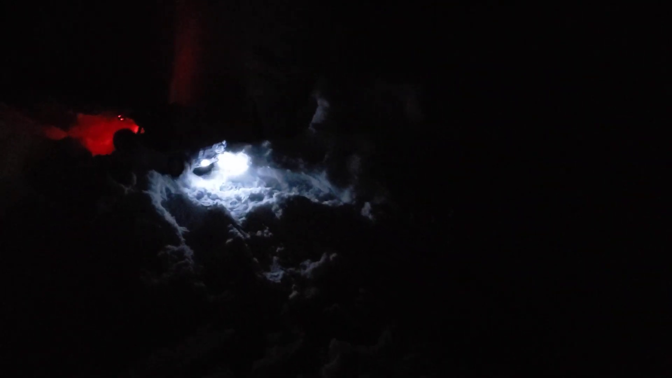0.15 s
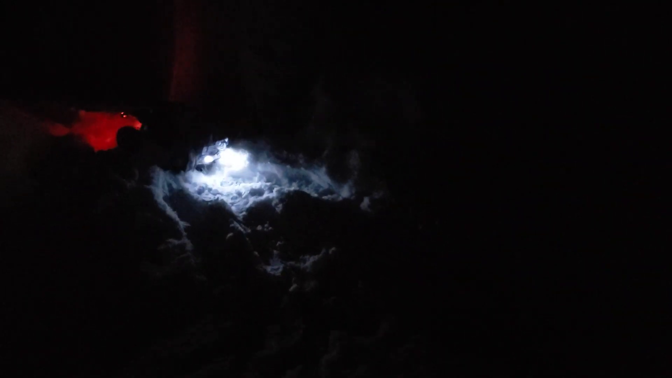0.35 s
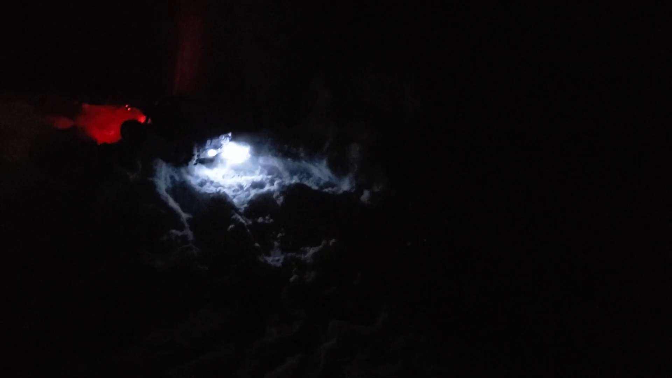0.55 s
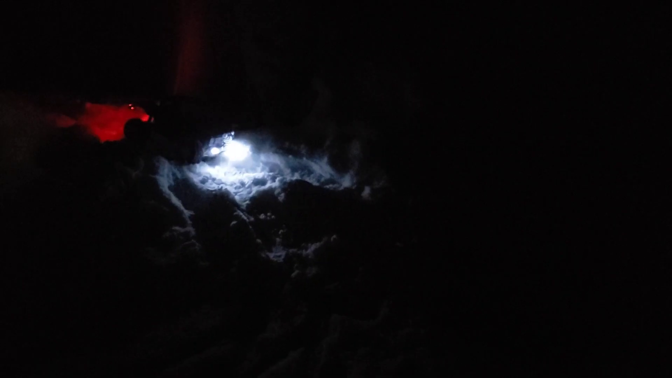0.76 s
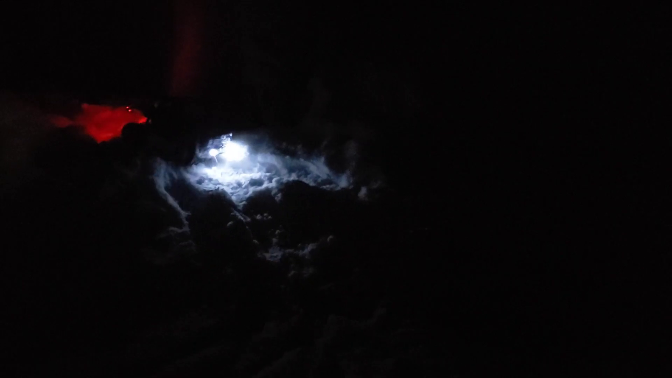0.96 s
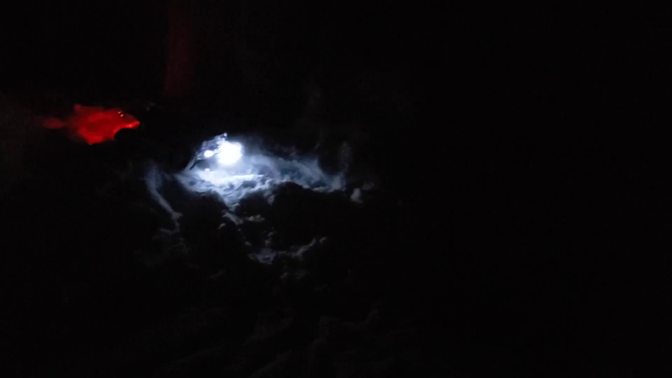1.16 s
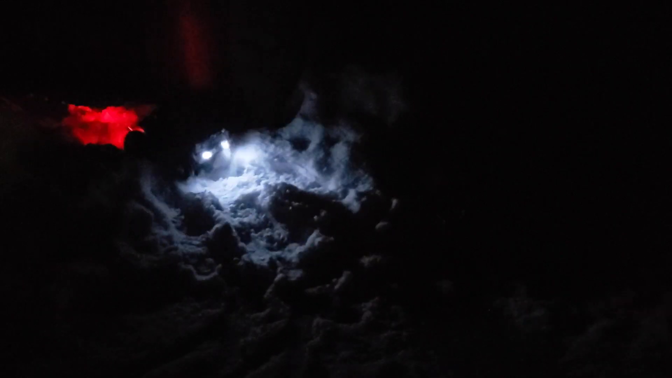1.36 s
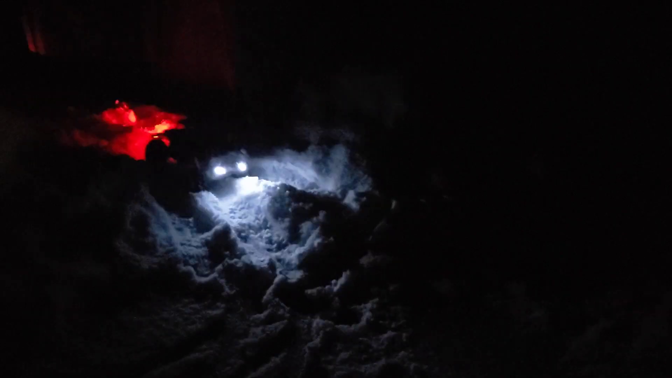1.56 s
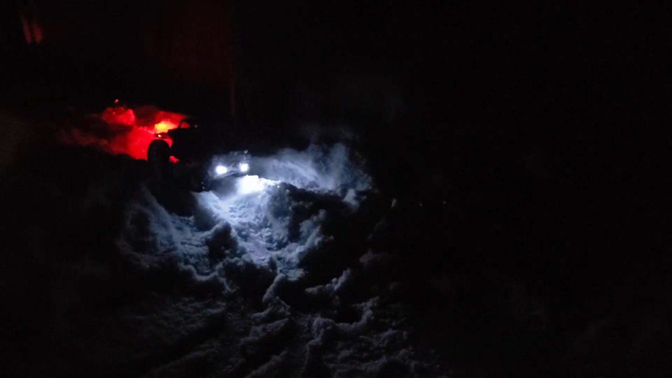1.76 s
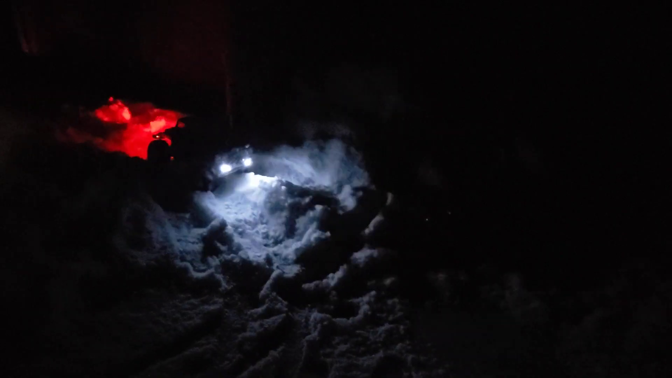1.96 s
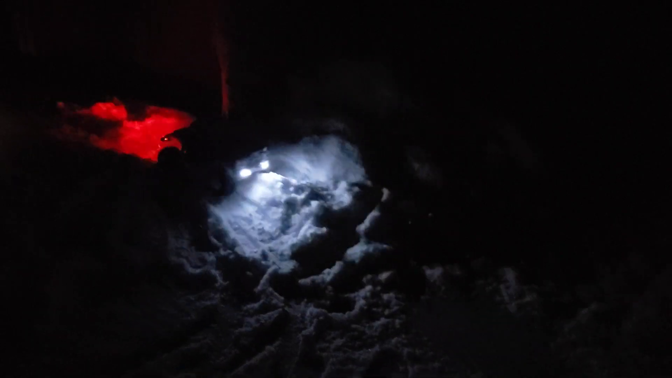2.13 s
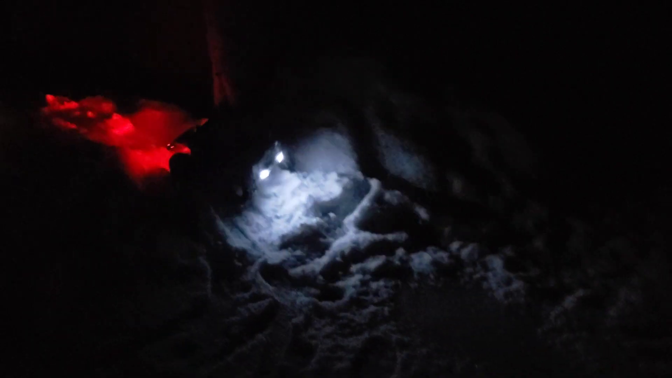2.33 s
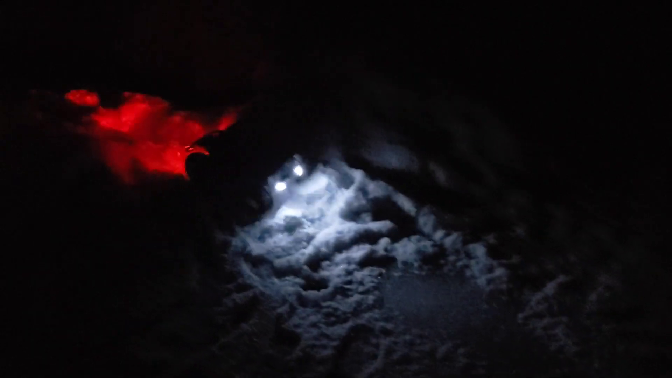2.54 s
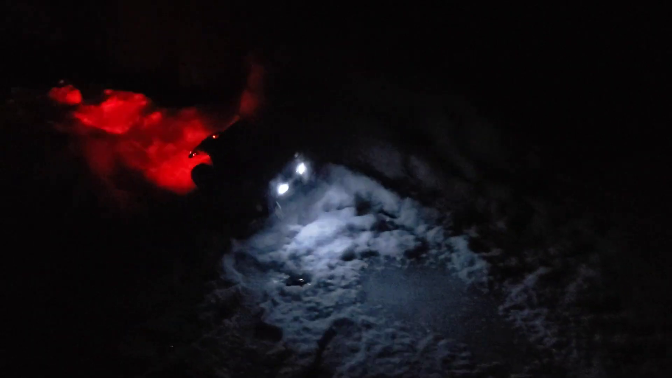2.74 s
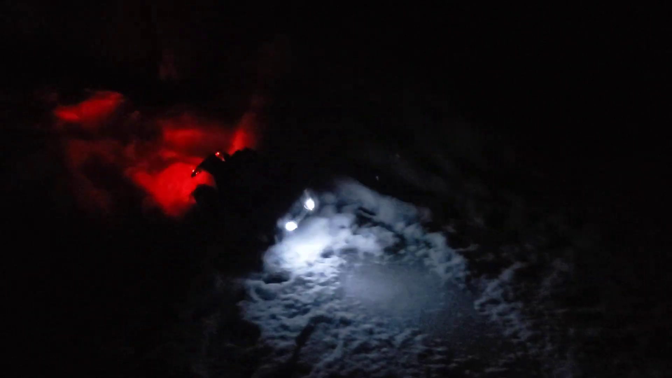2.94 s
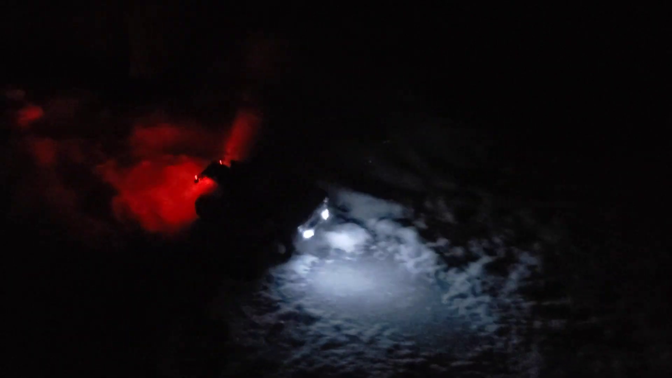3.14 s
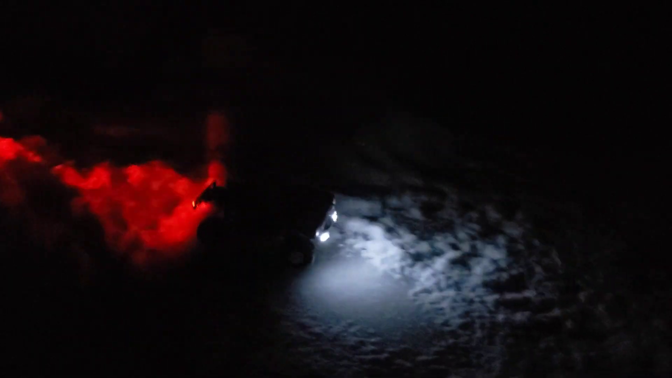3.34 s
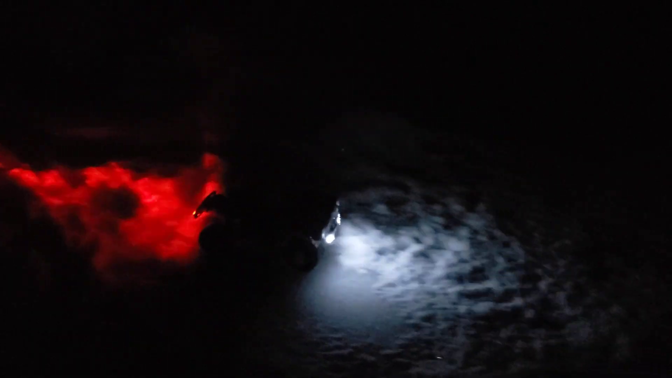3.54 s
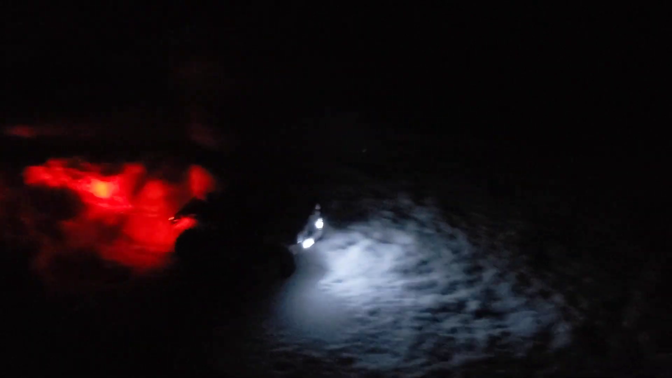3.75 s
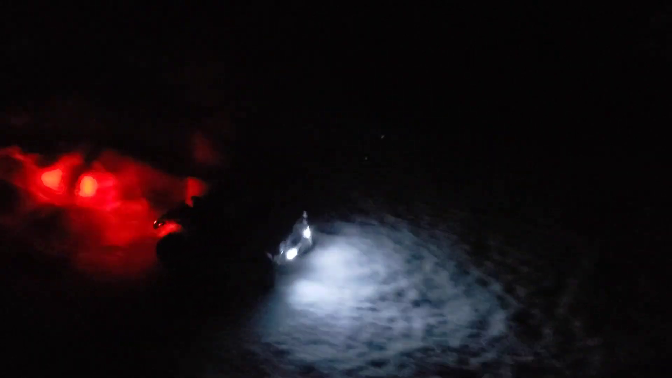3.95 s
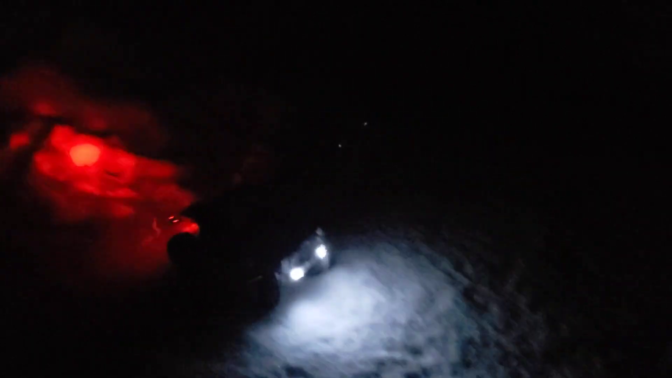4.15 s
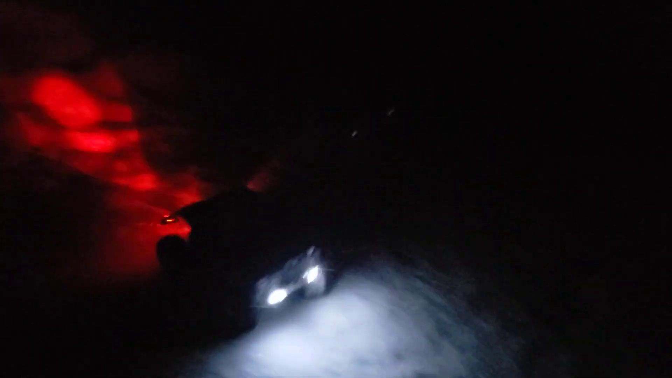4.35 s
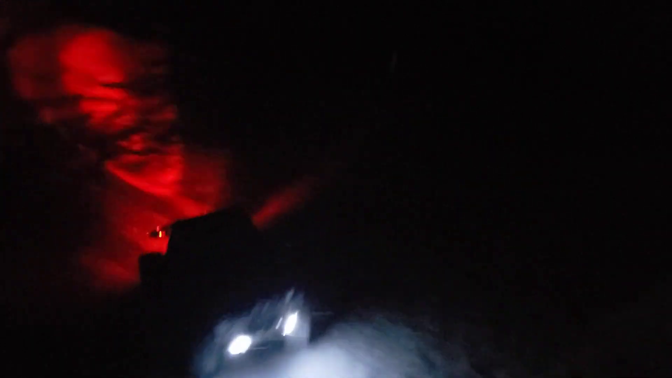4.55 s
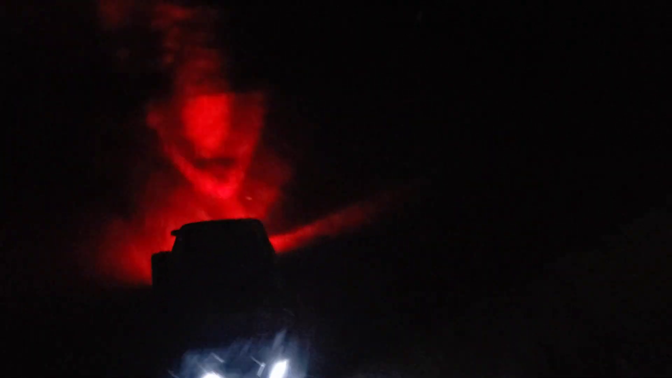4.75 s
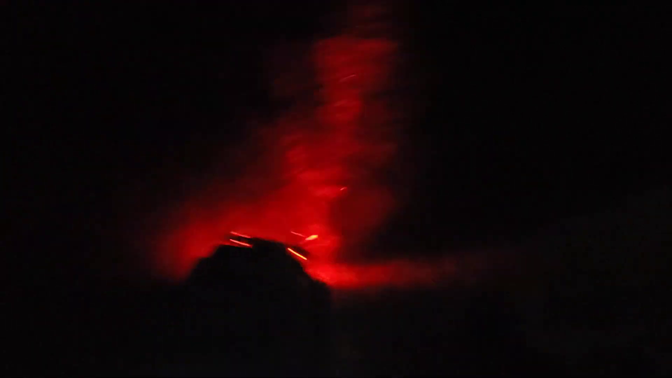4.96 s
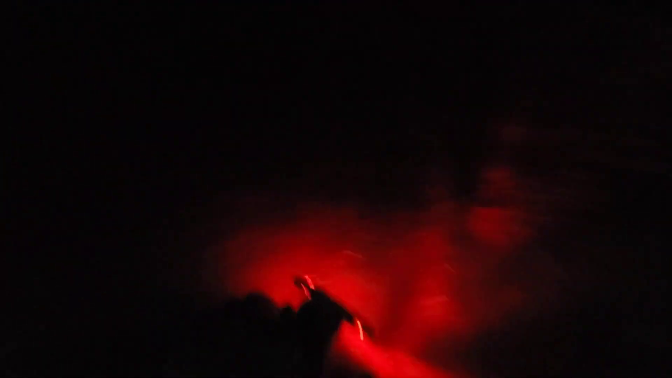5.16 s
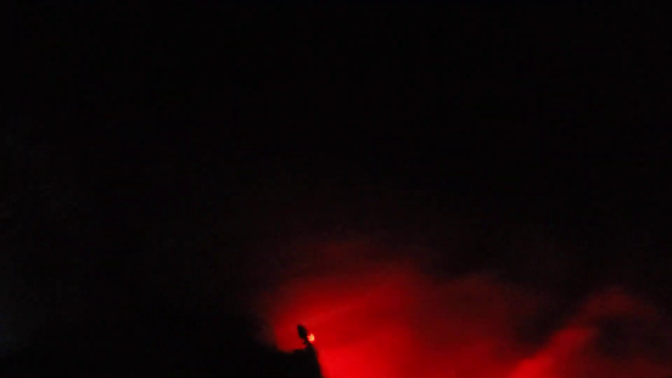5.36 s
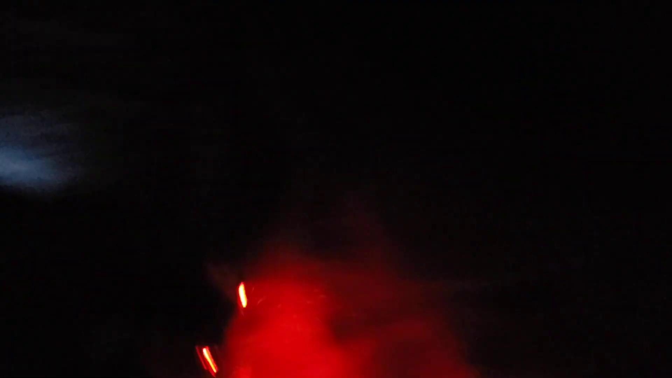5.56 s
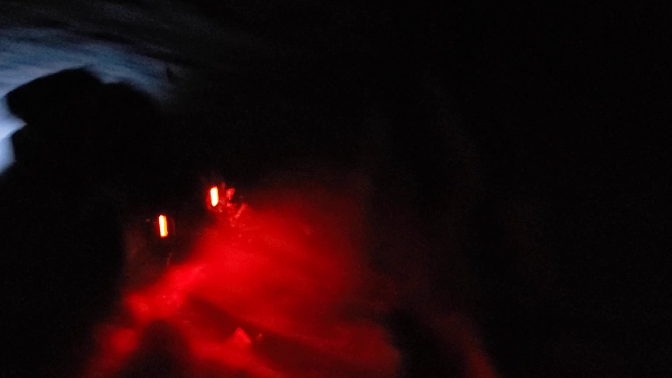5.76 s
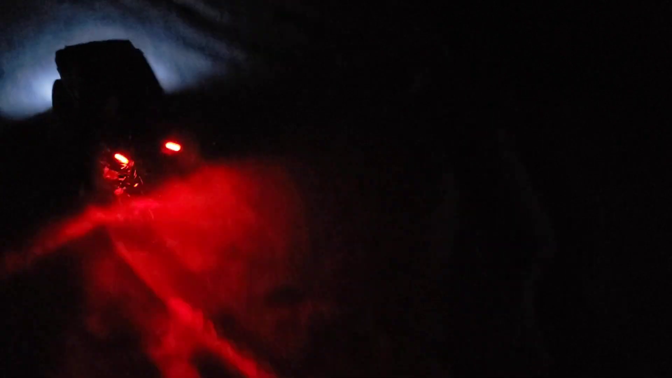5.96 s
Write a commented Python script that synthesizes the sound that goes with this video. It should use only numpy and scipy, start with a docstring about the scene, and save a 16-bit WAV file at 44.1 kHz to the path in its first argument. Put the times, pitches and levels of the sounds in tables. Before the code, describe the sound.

Quiet outdoor night, faint air and microphone hiss. A small radio-controlled truck with electric motor and plastic gears works in deep snow. A weak rattle fades at once; from 0.2 to 0.55 s it whirs harshly, with tyre crunch and small squeaks. Further bursts come around 0.8-1.05 and 1.15-1.6 s, with brief drops between. It nearly falls silent until about 1.9 s, when a wavering whine near 1.3-1.4 kHz resumes over light crunching. From 2.5 to 3.7 s the gears jerk, each bite giving a short sagging tone and dull thump. At 3.8 s the drive catches; the whine climbs to about 2.6 kHz by 4.4 s. The run continues louder and closer, throbbing some thirty times a second, with a low air puff near 4.85 s, heavy snow thumps, rasping gears and sharp squeaks, strongest around 5.3-5.8 s, lasting until the end near 6.1 s.

```python
"""Deep snow at night: a small radio-controlled truck digs in short bursts, then runs on louder, heard at two ports.
Gears: patchy noise hisses and rings a resonant plastic casing, throbbing as the gears bind.
Tones: tooth mesh and axle gears whine, loaded teeth squeak, the motor controller whistles at 8 kHz.
Tyres: lumpy noise kneads and crunches the snow; short noise envelopes thump as it gives way.
Background: quiet air and microphone hiss, plus one puff of air, strongest on the left port."""
import sys
import numpy as np
from scipy import signal
from scipy.fft import rfft, irfft, next_fast_len
from scipy.io import wavfile
from scipy.ndimage import uniform_filter1d, map_coordinates

SR = 44100
rng = np.random.default_rng(int(sys.argv[2]) if len(sys.argv) > 2 else 0)


def to_wav(sig):
    """Store sig (one row per channel, or 1-D mono) as 16-bit WAV at the path in sys.argv[1].

    Samples outside -1..1 are clipped; the rate is SR.
    """
    pcm = np.clip(np.atleast_2d(sig), -1, 1) * 32767
    pcm = np.round(pcm).astype(np.int16)
    wavfile.write(sys.argv[1], SR, pcm.T)  # frames by channels


N = 268877
TIME = np.arange(N) / SR


def amp(db):
    """dB to gain."""
    return 10 ** (np.asarray(db) / 20)


def unit(x):
    """Scale to rms 1."""
    return x / np.sqrt(np.mean(x ** 2) + 1e-20)


def along(points, hz):
    """Interpolate (frequency [Hz], value) points on a log frequency axis."""
    point_hz, values = np.transpose(points)
    return np.interp(np.log(hz + 1), np.log(point_hz + 1), values)


def curves(rows):
    """One value per sample for each column after the time."""
    time_s, *columns = np.transpose(rows)
    return [np.interp(TIME, time_s, column) for column in columns]


def wobble(rate_hz, size=N):
    """Smooth random curve with rate_hz random knots a second."""
    steps = np.arange(0, size + 16, 8)
    knots = rng.standard_normal(int(size * rate_hz / SR) + 5)
    return np.interp(np.arange(size), steps, map_coordinates(knots, [steps * rate_hz / SR]))


def filtered(x, response):
    """Multiply the spectrum of x by a complex response of frequency."""
    m = next_fast_len(N + 8192)
    return irfft(rfft(x, m) * response(np.fft.rfftfreq(m, 1 / SR)), m)[..., :N]


def swells(rows):
    """Summed power of bell-shaped bursts: (time [s], peak [dB], width at half power [ms])."""
    power = np.zeros(N)
    for s, db, ms in rows:
        near = slice(max(round((s - .1) * SR), 0), round((s + .1) * SR))
        power[near] += amp(2 * db) * .5 ** ((2000 * (TIME[near] - s) / ms) ** 2)
    return power


def gritty(grit_db, rate_hz):
    """Two noises sharing a jumpy size, as from many small unequal contacts."""
    return amp(grit_db * wobble(rate_hz)) * rng.standard_normal((2, N))


def coloured(pair, spectrum):
    """Shape noise by a (frequency [Hz], density [dB]) spectrum, then set rms 1."""
    return unit(filtered(pair, lambda hz: amp(along(spectrum, hz))))


def patchy(pair, patch_db):
    """Noise whose colour shifts from moment to moment."""
    z = signal.stft(pair, nperseg=256)[2]
    field = rng.standard_normal(z.shape[1:])
    field = uniform_filter1d(uniform_filter1d(field, 5, 0), 7, 1)
    return signal.istft(z * amp(patch_db * unit(field)), nperseg=256)[1][:, :N]


# drive train between throbs, nominal: (time [s], gear hiss [dB], casing ring [dB])
DRIVE_LEVELS = [(0, -65, -66), (.1, -72.5, -81), (.2, -55, -53.5), (.34, -48, -51.5), (.47, -56.5, -57),
                (.56, -62, -70), (.64, -77, -93), (.78, -51, -55), (.98, -53.5, -54.5), (1.1, -74, -74.5),
                (1.17, -48.5, -53), (1.4, -50, -52), (1.53, -53.5, -54), (1.62, -75, -72.5),
                (1.8, -84, -82), (1.99, -73, -66), (2.06, -56, -50.5), (2.45, -61, -49), (2.9, -63, -54),
                (3.28, -65, -56.5), (3.78, -55, -55), (3.86, -51, -44), (4.1, -48.5, -46.5),
                (4.95, -50, -46.5), (5.25, -49, -48), (5.6, -48, -51), (6.04, -49.5, -52), (6.1, -58, -55)]
# casing resonances: (centre [Hz], width [Hz], relative level at each heading [dB] x 7)
CASING_MODES = [(846, 575, -0.5, -0.5, -24, -2, -13.5, -13, -13),
                (1231, 496, -7, -5.5, -15.5, -9, -24.5, -2.5, -9.5),
                (1808, 345, -3.5, -5.5, -16, -20, -11.5, -11, -5.5),
                (2099, 406, -10, -20, -11, -1, -8, -2, -1.5), (2486, 350, -9, -1, -13, -8, -8, -11.5, 3.5),
                (3018, 575, -6, -2.5, -16, -11.5, -10, -3.5, -20),
                (3510, 360, -32, -13, -20, -17.5, -14.5, -28, -1.5),
                (4397, 410, -18, -13.5, -18, -15, -12, -15, -7),
                (4790, 270, -29, -17, -37, -33, -25, -31, -11),
                (6750, 630, -23.5, -24, -30, -20, -21, -25, -21),
                (10800, 3100, -28, -16, -21, -14, -11, -10.5, -7.5)]
# moments at which the turning truck holds each heading: time [s]
HEADING_TIMES_S = [0.499, 1.3, 2.3, 3.2, 4.1, 4.8, 5.6]
# gear hiss spectrum: (frequency [Hz], relative density [dB])
HISS_SPECTRUM = [(500, -8.5), (800, -28), (1200, -4), (2000, -2.5), (3000, -5.5), (4400, -13.5),
                 (5600, -16.5), (7500, -11.5), (9300, -11), (10500, -5.5), (13000, -7), (15800, -3)]


def gears(bindings):
    """Tooth contacts hiss, flare when the gears bind, and ring the casing."""
    hiss_db, ring_db = curves(DRIVE_LEVELS)
    # 6 dB down: flares are rated at the open left port, which hears the hiss twice as strong
    flare_power = swells(bindings) * .5 ** 2
    base_power = amp(2.095 * (hiss_db + 1.23 * wobble(25)))
    level = np.sqrt(base_power + flare_power)
    noise = patchy(gritty(grit_db=2.5, rate_hz=1100), patch_db=2.0)
    hiss = level * coloured(noise, HISS_SPECTRUM)
    ring = np.zeros((2, N))
    knocks = gritty(grit_db=2.0, rate_hz=280)
    for hz, width, *heading_db in CASING_MODES:
        # squared: steep resonance
        mode = filtered(knocks, lambda f: (1j * f * width / (hz * hz - f * f + 1j * f * width)) ** 2)
        # load shifting between teeth makes each mode come and go
        mode_db = np.interp(TIME, HEADING_TIMES_S, heading_db) + 2.73 * wobble(28)
        ring += amp(mode_db) * unit(mode)
    pulse = level / uniform_filter1d(level, SR // 10)
    return hiss + amp(ring_db) * pulse ** 0.58 * ring


# single jolts of the gears: (time [s], nominal peak [dB], width at half power [ms])
GEAR_JOLTS = [(.032, -63, 8), (.064, -59.5, 6.5), (.21, -50, 16), (.325, -45.5, 17), (.587, -59, 13),
              (.792, -45, 9.2), (1.063, -56, 9.3), (1.291, -44, 13), (1.608, -60, 29), (2.491, -48.5, 20),
              (2.567, -62, 38), (2.664, -51, 14), (2.704, -49, 45), (2.786, -49.5, 9.5), (2.857, -65, 16),
              (2.995, -43.5, 28), (3.184, -46.5, 26.3), (3.331, -42.5, 20), (3.364, -45.5, 11.6),
              (3.415, -54, 20), (3.509, -44.5, 25), (3.657, -54, 22), (3.771, -52, 2.9), (3.893, -42, 14),
              (3.923, -42, 5.1), (4.346, -39.5, 4.3), (4.883, -42, 12), (4.938, -33.5, 20),
              (5.008, -32.5, 15.6), (5.14, -31.5, 11), (5.185, -35.5, 17), (5.213, -32, 4.3),
              (5.317, -29.5, 5.9), (5.502, -23, 10), (5.653, -30, 13.3), (5.76, -31, 6.6), (5.794, -34, 9)]
# uneven shaft binds once a turn: (first [s], last [s], turn [ms], nominal peak over DRIVE_LEVELS hiss [dB])
SHAFT_TURNS = [(0.413, .52, 23, 8.5), (0.857, .98, 40.5, 5), (1.188, 1.46, 33, 6.5), (2.06, 2.42, 53.5, 7),
               (4.012, 4.34, 57.4, 9), (4.415, 4.75, 39.2, 9), (4.806, 5.1, 32, 13),
               (5.316, 5.66, 32.7, 14), (5.699, 6.09, 31.3, 15)]
# binding part of a turn; turn-to-turn chance
BIND_SHARE, BIND_SCATTER_DB, BIND_JITTER_MS = 0.35, 0.5, 2.5


def binds():
    """Bindings, once a shaft turn plus single jolts: (time [s], nominal peak [dB], width [ms])."""
    rows = list(GEAR_JOLTS)
    hiss_db = curves(DRIVE_LEVELS)[0]
    for first, last, turn_ms, over_db in SHAFT_TURNS:
        luck = rng.standard_normal((40, 2))
        for s, (late, size) in zip(np.arange(first, last, turn_ms / 1000), luck):
            peak_db = hiss_db[round(s * SR)] + over_db + size * BIND_SCATTER_DB
            rows.append((s + late * BIND_JITTER_MS / 1000, peak_db, BIND_SHARE * turn_ms))
    return rows


def pulsing(bindings, steady):
    """Gain around 1 that swells with every binding; a steady share stays."""
    binding = np.sqrt(swells(bindings))
    return steady + (1 - steady) * binding / (uniform_filter1d(binding, SR // 10) + 1e-9)


def warble(pitch_hz, wander, rough):
    """Phase and size of a tone shaken by unevenly loaded teeth."""
    n = len(pitch_hz)
    wandering_hz = pitch_hz * (1 + wander * wobble(44.78, size=n))
    phase = 2 * np.pi * np.cumsum(wandering_hz) / SR + rough * wobble(260, size=n)
    return phase, unit(1 + rough * wobble(130.65, size=n))


def stack(tables, overtones, wander, rough):
    """Rough gear tone with overtones, sounding only within its tables."""
    out = np.zeros(N)
    for rows in tables:
        s, pitch_hz, db = np.transpose(rows)
        near = slice(round(s[0] * SR) - 400, round(s[-1] * SR) + 400)
        t = TIME[near]
        phase, size = warble(np.interp(t, s, pitch_hz), wander, rough)
        fade = np.clip(50 * np.minimum(t - t[0], t[-1] - t), 0, 1)  # 20 ms ramps
        tone = sum(amp(over_db) * np.sin(k * phase) for k, over_db in overtones)
        out[near] += np.sqrt(2) * amp(np.interp(t, s, db)) * size * fade * tone
    return out


# the load bites, the mesh tone jumps up and sags: (time [s], first pitch [Hz], nominal peak [dB], length [s])
LOAD_BITES = [(2.472, 1540, -50.5, 0.077), (2.563, 1560, -59, 0.054), (2.653, 1560, -55.5, 0.18),
              (2.777, 1406, -49.5, 0.28), (3.317, 1496, -46.5, 0.051), (3.502, 1337, -48.5, 0.074),
              (3.7, 1140, -51.5, 0.14)]
# settled over first pitch, settling time, level loss over the length
SAG_RATIO, SAG_S, BITE_FADE_DB = .83, 0.04, 19


def bites():
    """A pitch and level table for each bite: the pitch settles, the level fades."""
    u = np.linspace(0, 1, 12)
    tables = []
    for s, hz, db, span_s in LOAD_BITES:
        pitch_hz = hz * (SAG_RATIO + (1 - SAG_RATIO) * np.exp(-u * span_s / SAG_S))
        tables.append(np.transpose([s + u * span_s, pitch_hz, db - BITE_FADE_DB * u]))
    return tables


# tooth mesh, one table a stretch: (time [s], pitch [Hz], nominal level [dB])
MESH_STRETCHES = [
    [(.18, 1467, -75), (.21, 1495, -59), (.26, 1470, -56), (.31, 1620, -72), (.4, 1685, -54),
     (.48, 1690, -74)],
    [(.76, 1680, -68), (.8, 1640, -57.5), (.86, 1745, -62), (.94, 1680, -53), (.99, 1323, -71),
     (1.07, 1245, -72)],
    [(1.15, 1650, -57), (1.18, 1660, -52), (1.23, 1737, -73)],
    [(1.87, 1400, -78), (1.93, 1410, -60.5), (2, 1330, -73), (2.03, 1210, -56), (2.065, 1410, -63),
     (2.085, 1310, -50), (2.12, 1400, -58), (2.15, 1500, -53), (2.185, 1290, -58), (2.22, 1440, -61),
     (2.28, 1360, -56), (2.34, 1300, -58), (2.38, 1400, -58), (2.44, 1330, -65)],
    [(3.79, 1150, -57), (3.81, 1200, -39), (3.835, 1240, -44), (3.86, 1520, -50), (3.9, 1640, -51),
     (3.93, 1900, -57), (3.95, 2080, -35), (4, 2070, -41.5), (4.03, 2020, -44), (4.05, 2120, -54),
     (4.08, 2180, -44.5), (4.2, 2290, -54), (4.4, 2567, -44.5), (4.47, 2610, -59)],
]
# axle gears singing at speed, one table a stretch: (time [s], pitch [Hz], nominal level [dB])
AXLE_STRETCHES = [
    [(4.47, 1430, -61), (4.7, 1410, -50), (4.86, 1396, -50), (5.06, 1413, -47), (5.12, 1383, -64),
     (5.19, 1440, -50)],
    [(5.2, 1223, -54), (5.34, 1210, -49), (5.48, 1200, -50.5), (5.55, 1193, -74)],
]
# harmonics added to the nominal level: (multiple of pitch [1], gain [dB])
HARMONICS = [(1, 2), (2, -18), (3, -30)]


def whine(bindings):
    """Mesh and axle tones pulse as the gears bind; biting loads add sagging mesh tones."""
    mesh = stack(MESH_STRETCHES, HARMONICS, wander=.012, rough=.45)
    bite = stack(bites(), HARMONICS, wander=.015, rough=.5)
    axle = stack(AXLE_STRETCHES, HARMONICS[:1], wander=.015, rough=.55)
    return pulsing(bindings, steady=.5) * (mesh + axle) + bite


# loudest squeaks of loaded teeth:
# (centre time [s], mid pitch [Hz], glide either side [Hz], nominal peak [dB], nominal length [ms])
LOUD_SQUEAKS = [(0.232, 2980, -23, -46.5, 52), (.165, 926, 30, -52.5, 46), (.294, 1970, 50, -51.5, 20),
                (.365, 1830, 30, -51, 25), (.415, 3290, -100, -50, 40), (.418, 5000, -80, -58, 38),
                (1.172, 3150, 250, -56, 25), (1.235, 4770, 80, -53.5, 26.6), (1.409, 3100, -150, -51, 25),
                (4.739, 3020, -120, -44, 33), (5.08, 2402, 247, -52, 90), (5.41, 1920, 0, -47, 16),
                (5.907, 2540, -60, -43, 38), (6.012, 3920, -60, -48, 18.3), (.321, 4600, -220, -54, 27),
                (.371, 3580, -150, -54, 55), (.929, 5210, 120, -57.5, 21), (1.295, 2590, -290, -43, 35),
                (1.38, 3080, -160, -40.5, 28), (1.447, 2620, -190, -58, 20), (2.146, 4270, -17, -60.5, 72),
                (2.701, 2136, -38, -49.5, 29), (2.79, 2090, -38, -48, 20), (4.061, 4530, -50, -46, 20),
                (4.116, 4440, -170, -48, 53), (4.411, 2620, -90, -45, 28), (4.451, 2650, -120, -47, 26),
                (4.748, 2115, 45, -43.5, 47), (5.041, 2007, -100, -43.5, 51), (5.135, 3640, 60, -47, 25),
                (5.206, 2275, -28, -42, 70), (5.315, 1800, 0, -39.5, 14), (5.449, 2530, 180, -43, 120),
                (5.506, 2080, 52, -54, 22), (5.639, 3774, -140, -46, 49), (5.65, 2570, -64, -40, 41),
                (5.76, 10050, 12, -40, 26), (5.794, 3480, -92, -35, 22), (5.794, 10200, -90, -39, 16),
                (6.016, 1866, -45, -37.5, 13), (6.045, 1737, 22, -43, 13.4)]
# small squeaks: over the nominal casing mode, typical length and glide, pitch scatter ratio
SQUEAL_DB, SQUEAL_MS, SQUEAL_GLIDE_HZ, SQUEAL_SPREAD = 2.5, 30, 110.5, .05


def squeaks(bindings):
    """Brief, rough, gliding tones; every binding sets off two small ones near casing resonances."""
    out = np.zeros(N + SR)
    ring_db = curves(DRIVE_LEVELS)[1]
    small = []
    chances, picks = rng.standard_normal((300, 3)), rng.integers(1, 9, 300)
    for (s, _, _), (off, glide, size), pick in zip(bindings * 2, chances, picks):
        mode_hz, _, *heading_db = CASING_MODES[pick]
        mode_db = ring_db[round(s * SR)] + np.interp(s, HEADING_TIMES_S, heading_db)
        pitch_hz = mode_hz * (1 + SQUEAL_SPREAD * off)
        length_ms = SQUEAL_MS * np.exp(0.41 * off)
        small.append((s, pitch_hz, SQUEAL_GLIDE_HZ * glide, mode_db + SQUEAL_DB + 3 * size, length_ms))
    for s, hz, glide_hz, db, ms in [*LOUD_SQUEAKS, *small]:
        u = np.linspace(-1, 1, round(1.3 * ms * SR / 1000))
        phase, size = warble(hz + glide_hz * u, wander=.01, rough=.35)
        start = max(round(s * SR) - len(u) // 2, 0)
        out[start:][:len(u)] += np.sqrt(2) * amp(db) * np.cos(np.pi / 2 * u) * size * np.sin(phase)
    return out[:N]


# controller switching: (time [s], nominal whistle [dB], sideband spacing [Hz], sideband over whistle [dB])
SWITCHING = [(0, -80, 150, -15), (.4, -74, 250, -20), (1.3, -82, 250, -4), (1.5, -100, 100, -4),
             (1.8, -100, 80, -12), (1.86, -72.5, 140, -11), (2.05, -77, 160, -7), (2.5, -80, 300, -2),
             (3.3, -71, 320, -9), (3.7, -77, 250, 5), (3.85, -77, 270, 5), (4.05, -74, 480, -6),
             (4.3, -78, 550, -25)]
SWITCH_HZ = 8000
SMEAR_HZ = 300  # sideband spacing giving 1 rad of phase shake and 3.2 dB of level shake


def whistle():
    """Controller switching tone with sidebands; wider spacing shakes its phase and level more."""
    whistle_db, spacing_hz, side_db = curves(SWITCHING)
    beat = np.cos(2 * np.pi * np.cumsum(spacing_hz * (1 + 0.036 * wobble(30))) / SR)
    smear = spacing_hz / SMEAR_HZ
    level = amp(whistle_db - smear * (0.5 + 3.2 * wobble(14)))
    carrier = np.sin(2 * np.pi * SWITCH_HZ * TIME + smear * wobble(90))
    running = TIME < SWITCHING[-1][0]
    return level * (1 + 2 * amp(side_db) * beat) * carrier * running


# tyres in the snow, nominal: (time [s], deep kneading [dB], crunch [dB])
TYRE_LEVELS = [(0, -59, -61), (.08, -72, -63), (.22, -50, -56.5), (.5, -50.5, -52.5), (.6, -63.5, -68),
               (.76, -63, -56), (.87, -50.5, -54), (1.05, -53.5, -59), (1.36, -55.5, -54.5),
               (1.66, -62.5, -62.5), (1.8, -82, -79), (2.05, -62.5, -59.5), (2.5, -68.5, -61),
               (2.9, -63, -56.5), (3.5, -63.5, -60.5), (3.75, -70, -63), (4, -57.5, -54), (4.5, -55, -51.5),
               (5, -52, -47.5), (5.7, -49, -43.5), (6.1, -49.5, -49.5)]
# kneading and deep-thump spectrum: (frequency [Hz], relative density [dB])
DEEP_SPECTRUM = [(25, -43), (42, -4), (60, 0.5), (90, 3), (150, 5), (230, 4.5), (350, -66)]
# crunch spectrum: (frequency [Hz], relative density [dB])
CRUNCH_SPECTRUM = [(120, -15.5), (220, -9), (340, 0), (500, -3.5), (750, -10), (1100, -13), (1800, -40.5)]


def snow(bindings):
    """Treads knead the snow in lumps, crunch it and break through; small clods fall at random."""
    deep_db, crunch_db = curves(TYRE_LEVELS)
    deep = amp(deep_db) * coloured(gritty(grit_db=1.0, rate_hz=77), DEEP_SPECTRUM)
    crunch_level = pulsing(bindings, steady=0.83) * amp(crunch_db + 1.8 * wobble(12))
    crunch = crunch_level * coloured(gritty(grit_db=3, rate_hz=150), CRUNCH_SPECTRUM)
    return deep + crunch + thumps(crunch_db)


# packed snow gives way under a wheel: (time [s], strength before envelope [dB], depth [0-1])
SNOW_COLLAPSES = [(0.221, -33.5, 0.52), (.379, -32, 0.88), (0.816, -30, 0.73), (1.189, -32, .55),
                  (1.307, -33.5, .7), (2.371, -38, 0.1), (2.557, -39.5, 0), (2.644, -41, 0.2),
                  (2.697, -28.5, 0.14), (2.719, -34, 0.04), (2.854, -50, 0), (2.992, -28.5, 0.32),
                  (3.125, -37, 0.3), (3.293, -32, 0), (3.319, -32.5, .05), (3.494, -38, .05),
                  (3.961, -33.5, 0.5), (4.144, -24.5, 0.58), (4.404, -38, .05), (4.46, -27, 0.27),
                  (4.503, -29, 0.13), (4.599, -27.5, 0), (4.688, -30.5, 0.35), (4.732, -32, 0.7),
                  (4.894, -25.5, 0.07), (4.989, -27, .25), (5.034, -27, 0.61), (5.167, -20, 0.16),
                  (5.197, -30, .1), (5.222, -29.5, 0.22), (5.301, -24, 0.16), (5.331, -14.5, 0.16),
                  (5.36, -28, 0.5), (5.473, -19.5, 0.03), (5.502, -33.5, 0.25), (5.6, -24, 0.05),
                  (5.64, -22, 0.28), (5.725, -21, .05), (5.835, -26, .1), (5.898, -27.5, .05),
                  (5.989, -33.5, 0.3)]
# shallow-thump spectrum: (frequency [Hz], relative density [dB])
THUD_SPECTRUM = [(30, -20), (60, -23), (160, -7), (330, 2.5), (520, -3), (800, -14.5), (1500, -33)]
THUMP_RISE_MS = 5.96
SETTLE_SHARE, SETTLE_MS = 0.058, 39  # loose snow slides after the collapse
CLODS_PER_S = 9
CLOD_DB, CLOD_SCATTER_DB, CLOD_DEPTH = 9, 3, 0.16  # strength over crunch, scatter, depth 0-1


def thumps(crunch_db):
    """Snow collapses quickly, then settles; a deep collapse sounds lower."""
    count = round(CLODS_PER_S * N / SR)
    when, size = rng.random(count), rng.standard_normal(count)
    clods = [(w * N / SR, crunch_db[int(w * N)] + CLOD_DB + CLOD_SCATTER_DB * z, CLOD_DEPTH)
             for w, z in zip(when, size)]
    shallow, sunk = np.zeros((2, N + SR // 10))
    u = TIME[:SR // 10] * 1000 / THUMP_RISE_MS
    collapse = u * np.exp(-u)
    settling = SETTLE_SHARE * (1 - np.exp(-u)) * np.exp(-u * THUMP_RISE_MS / SETTLE_MS)
    for s, db, depth in [*SNOW_COLLAPSES, *clods]:
        fall = amp(db) * (collapse + settling) / np.sqrt(2)
        mix = np.pi / 2 * np.clip(depth, 0, 1)
        shallow[round(s * SR):][:len(u)] += fall * np.cos(mix)
        sunk[round(s * SR):][:len(u)] += fall * np.sin(mix)
    pair = gritty(grit_db=1.2, rate_hz=110)
    return shallow[:N] * coloured(pair, THUD_SPECTRUM) + sunk[:N] * coloured(pair, DEEP_SPECTRUM)


# the housing shades the right port: (frequency [Hz], left minus right [dB])
PORT_SHADE = [(40, -3), (90, 0.5), (300, 0), (770, 2.5), (1150, 3), (1450, 7), (1800, -1), (2150, -4),
              (2600, -1), (3100, 1), (3600, 3.5), (4400, 6), (6400, 20), (9800, 9.5), (15000, 12)]
# likeness of the ports: (frequency [Hz], correlation [0-1])
PORT_LIKENESS = [(40, 0.18), (70, 0.93), (110, 1), (300, 1), (700, 0.87), (1500, 0.28), (3000, 0.59),
                 (6000, 0.13), (12000, 0.091)]
# sound reaches the left port first: (frequency [Hz], phase lead [rad])
PORT_LEAD = [(0, 0), (1120, 1.52), (1980, 1.17), (2500, 3.5), (3450, 4), (3790, 4.5), (4570, 8),
             (8270, 7.5), (8870, 12.5), (11300, 22), (12100, 25.5), (14300, 23), (15200, 23), (16500, 44)]


def ports(pair):
    """A shared and a differing part reach both ports, with phase lead and shading between them."""
    def split(hz):
        angle = np.arccos(np.clip(along(PORT_LIKENESS, hz), 0, 1)) / 2
        return np.array([np.cos(angle), np.sin(angle)])

    side = np.array([[.5], [-.5]])  # half the difference to each port

    def shade_and_lead(hz):
        lead_rad = np.interp(hz, *np.transpose(PORT_LEAD))
        return amp(side * along(PORT_SHADE, hz)) * np.exp(1j * side * lead_rad)

    shared, other = filtered(pair, split)
    return filtered(np.array([shared + other, shared - other]), shade_and_lead)


# still air and microphone hiss: (frequency [Hz], relative density [dB])
NIGHT_SPECTRUM = [(15, -18), (25, -38), (59, 30.5), (291, -9), (371, -17), (604, 13.5), (710, 9.5),
                  (1010, 11), (1510, -5), (6660, -95), (15800, 2.5)]
NIGHT_DB = -70  # before port shading
# one puff of air: (time [s], peak before port gains [dB], width at half power [ms])
AIR_PUFF = (4.857, -31.5, 15.3)


def air():
    """Quiet-night noise, and a 52 Hz puff of air 13 dB stronger on the left port."""
    night = amp(NIGHT_DB) * ports(coloured(rng.standard_normal((2, N)), NIGHT_SPECTRUM))
    puff = np.sqrt(swells([AIR_PUFF])) * np.sin(2 * np.pi * 52 * TIME)
    return night + puff * amp([[5], [-8]])


def scene():
    """Truck and night at the two ports."""
    bindings = binds()
    tones = whine(bindings) + squeaks(bindings) + whistle()
    truck = gears(bindings) + snow(bindings) + tones * [[1], [.1]]  # shared, differing part
    return ports(truck) + air()


def record(dry):
    """Keep nothing above the 15.9 kHz band limit."""
    return filtered(dry, lambda hz: hz < 15900)


dry = scene()
out = record(dry)
to_wav(out)
```